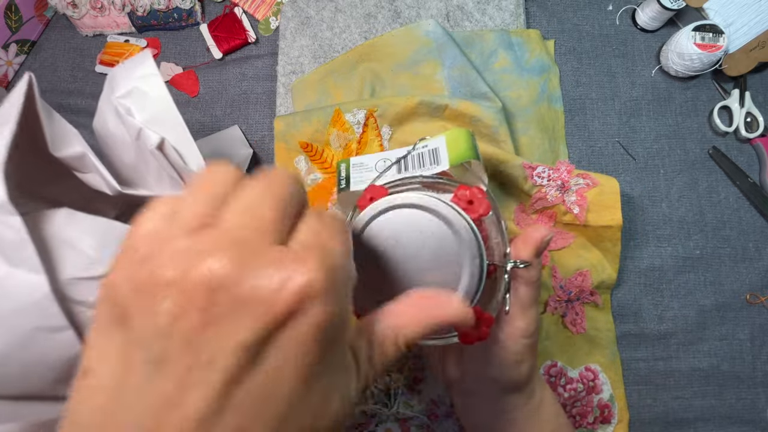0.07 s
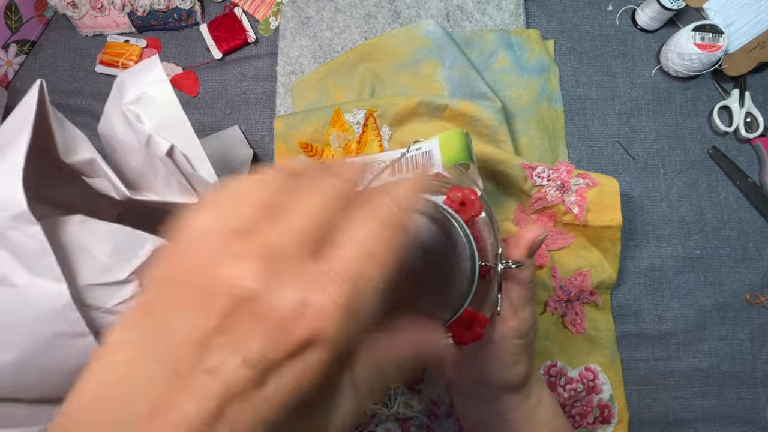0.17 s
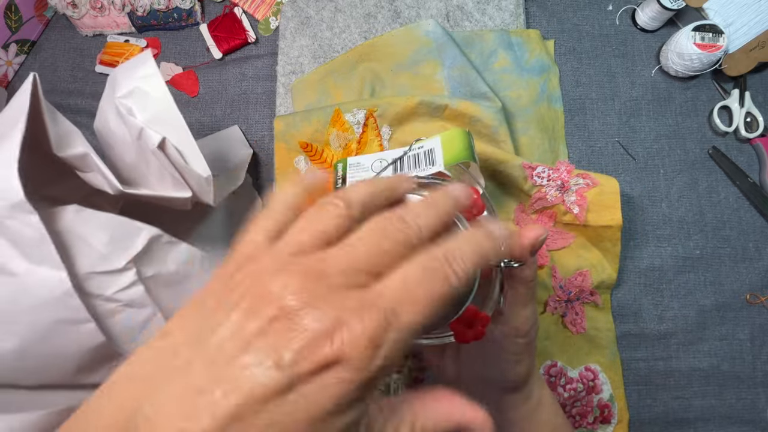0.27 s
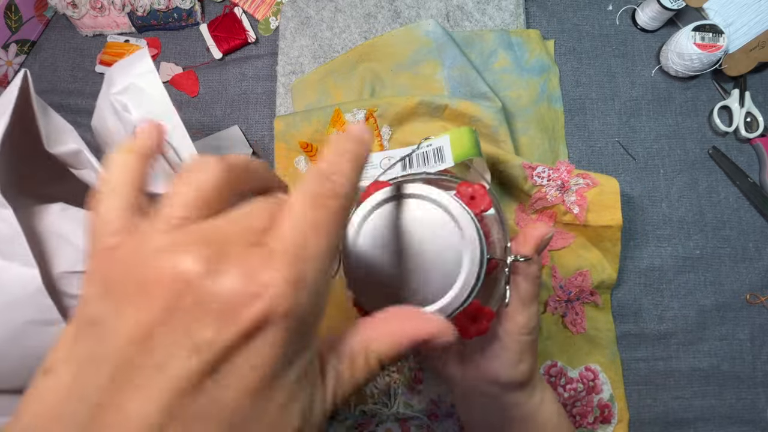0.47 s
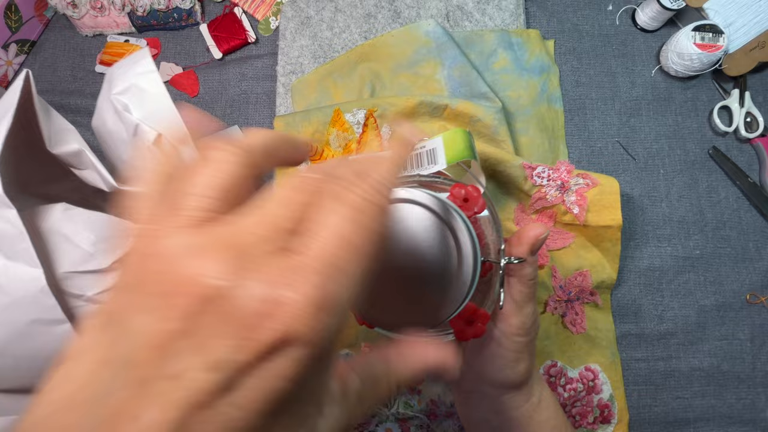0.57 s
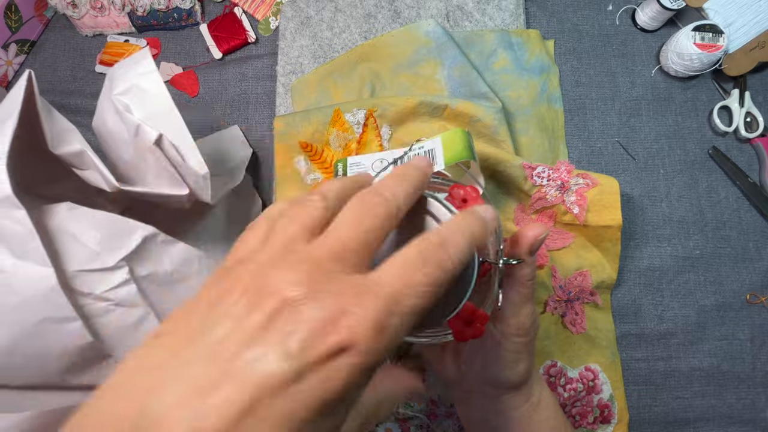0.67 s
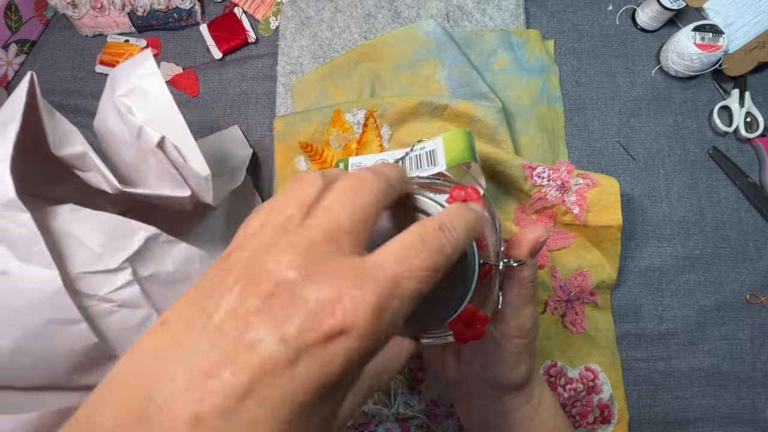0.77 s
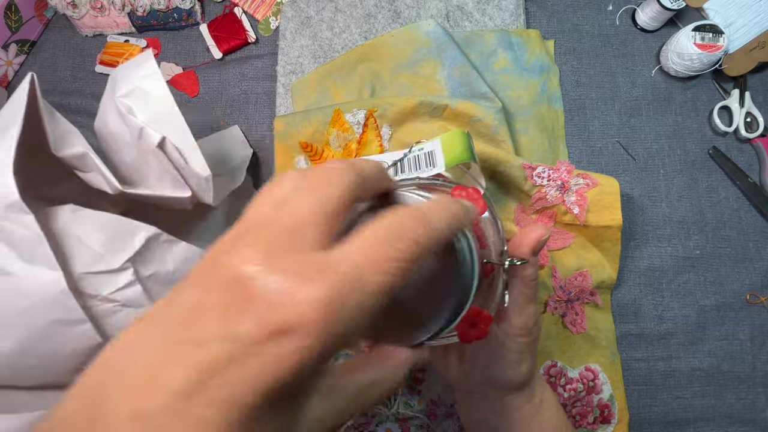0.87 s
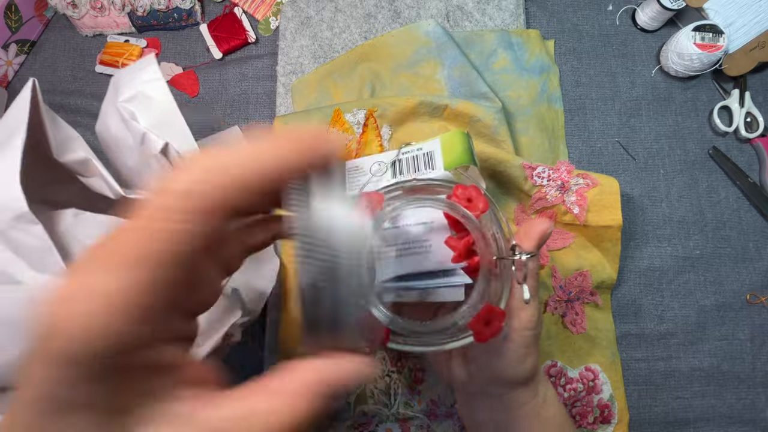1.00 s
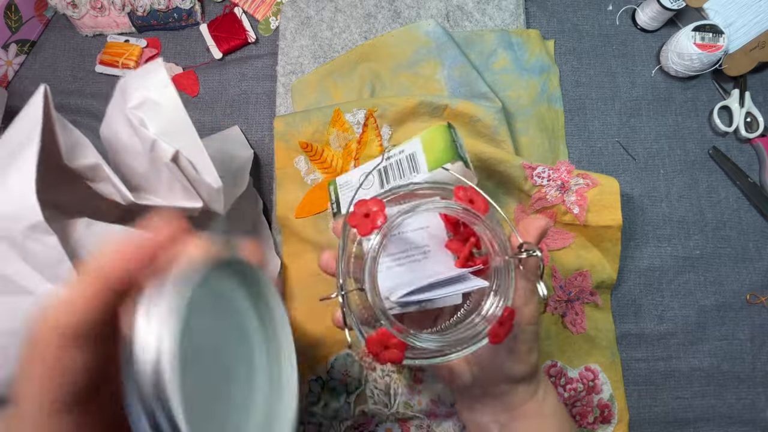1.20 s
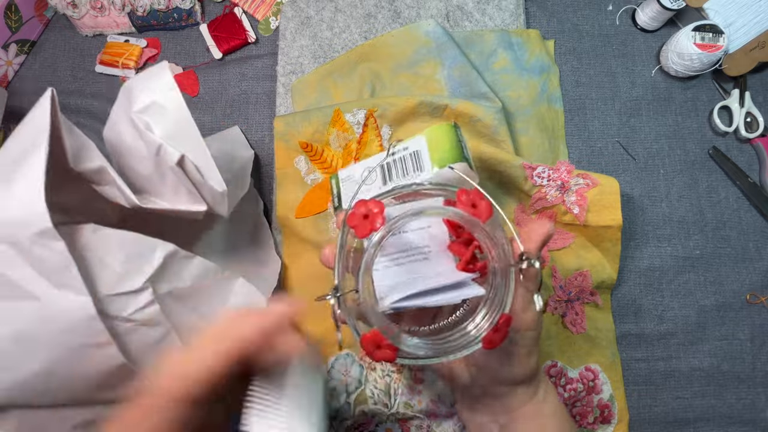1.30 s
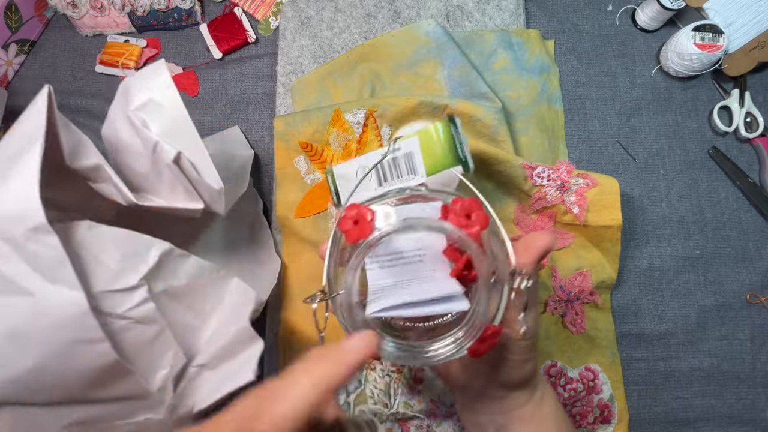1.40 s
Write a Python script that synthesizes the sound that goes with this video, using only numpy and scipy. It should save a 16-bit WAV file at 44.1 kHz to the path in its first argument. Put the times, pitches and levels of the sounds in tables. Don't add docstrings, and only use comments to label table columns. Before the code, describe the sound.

Close scraping and clinking of a tin lid unscrewed from a glass jar, then faint cloth rustle

```python
import sys
import numpy as np
from scipy import signal
from scipy.fft import rfft, irfft, next_fast_len
from scipy.io import wavfile
from scipy.ndimage import uniform_filter1d, map_coordinates

SR = 44100
rng = np.random.default_rng(int(sys.argv[2]) if len(sys.argv) > 2 else 0)


def elevation(decibels):
    levels = np.asarray(decibels, float)
    return 10 ** (levels / 20)


def digitize_waveform(pressure):
    field = np.atleast_2d(pressure).T
    bounded = np.clip(field, -1, 1)
    quanta = np.round(bounded * 32767).astype(np.int16)
    wavfile.write(sys.argv[1], SR, quanta)


N = 63945


def unit(x):
    return x / np.sqrt(np.mean(x ** 2) + 1e-20)


def along(points, hz):
    f, v = np.transpose(points)
    return np.interp(np.log(hz + 1), np.log(f + 1), v)


def curve(rows):
    s, *cols = np.transpose(rows)
    return [np.interp(np.arange(N) / SR, s, c, left=-120) for c in cols]


def wobble(rate):
    return map_coordinates(rng.standard_normal(3000), [np.arange(N) * rate / SR])


def filtered(x, response):
    m = next_fast_len(N + SR // 2)
    return irfft(rfft(x, m) * response(np.fft.rfftfreq(m, 1 / SR)), m)[..., :N]


def resonances(modes, f):
    total = 0
    for k, (hz, width, db) in enumerate(modes):
        total = total + (-1) ** k * elevation(db) * 1j * f * width / (hz * hz - f * f + 1j * f * width)
    return total


def grit(grain_db, slow_db):
    swell = elevation(grain_db * wobble(900) + slow_db * wobble(44.73))
    return unit(swell * rng.standard_normal((2, N)))


def since(s):
    return np.maximum(np.arange(N) / SR - s, 0)


def thud(rows, t60, rise_s):
    total = 0
    for s, db, hz in rows:
        t = since(s)
        total = total + elevation(db - 60 * t / t60) * (1 - np.exp(-t / rise_s)) * np.sin(2 * np.pi * hz * t)
    return total


def patchy(x, depth_db):
    z = signal.stft(x, nperseg=256)[2]
    field = rng.standard_normal(z.shape[1:])
    field = uniform_filter1d(uniform_filter1d(field, size=4, axis=0), size=9, axis=1)
    return signal.istft(z * elevation(depth_db * unit(field)), nperseg=256)[1][:, :N]


def lid():
    # t/s, level/dB, brightness/dB
    twist = [(.226, -62, 2), (.262, -54.5, -12), (.295, -38.5, 10.5), (.33, -40.5, 1.5), (.36, -37.5, -1.5),
             (.375, -34, 5.5), (.425, -30.5, 7.5), (.44, -35, 4), (.47, -35, 1.5), (.50, -38, 4.5),
             (.56, -39, 3.5), (.585, -43, -9), (.64, -48, -6.5), (.70, -60.5, -11), (.76, -55.5, -16.5),
             (.87, -70.5, -8)]
    press_db, bright_db = curve(twist)
    bright_db = np.maximum(bright_db, -20)
    before = elevation(-48.5 - 60 * since(0) / 0.18)
    snags, tilt = catches()
    tinny = tin_lid(press_db, bright_db, before, snags, tilt)
    return tinny + hollow_jar(elevation(press_db) + before, snags.sum(0)) + knocks() + taps_and_pings()


def catches():
    # t/s, peak/dB, length/s, brightness/dB
    catch_rows = [(0.053, -50, 0.0086, 3), (0.13, -54.5, 0.012, -2), (0.392, -36, 0.0034, -3),
                  (.408, -25, 0.0024, -3), (.413, -28, 0.0018, 3), (0.43, -42, 0.0027, 1),
                  (0.471, -27, 0.0036, 0), (0.495, -23, 0.0032, -14), (0.2346, -28.5, 0.0046, 7),
                  (0.2412, -29, 0.0079, -1), (0.269, -39, 0.012, -4), (0.277, -36, 0.022, 2),
                  (0.3026, -27, 0.0041, -7), (0.4437, -21, 0.0079, 13), (0.4511, -19, 0.0055, 19),
                  (0.5984, -15, 0.0065, 8.5), (0.605, -34, 0.015, -18), (.624, -23.5, 0.0059, -2),
                  (0.666, -38, 0.0049, -5), (0.7185, -31, 0.0024, 4), (0.729, -36, 0.0019, -25.5),
                  (0.744, -40, 0.0029, 3), (0.7483, -45.5, 0.0078, -10), (0.7808, -43, 0.0039, -13)]
    rise_s = 0.0012
    bursts = []
    for s, db, hold_s, _ in catch_rows:
        t = since(s)
        bursts.append(elevation(db - 7.5) * (1 - np.exp(-t / rise_s)) * np.exp(-(t / hold_s) ** 2))
    return np.array(bursts), elevation(np.array(catch_rows)[:, 3] / 2)


def tin_lid(press_db, bright_db, before, snags, tilt):
    # f/Hz, width/Hz, level/dB
    lid_modes = [(1909, 30, 19), (2585, 40, -1), (3420, 70, 4), (4080, 110, 2), (4670, 55, 7),
                 (6300, 80, 0), (4910, 60, 2), (9200, 200, 3), (10340, 230, -3), (11100, 150, -8)]
    dull = elevation(press_db - bright_db / 2) + before
    sharp = elevation(press_db + bright_db / 2) + 0.26 * before
    grains = unit(patchy(grit(grain_db=1.5, slow_db=1.7), depth_db=2.5))
    scrape = tin(dull, sharp, 3200, grains)
    catch = tin((1 / tilt) @ snags, tilt @ snags, 7000, grit(grain_db=2.0, slow_db=-1.1))

    low_scrape = elevation(press_db - 0.79 * bright_db / 2) * grit(grain_db=2.5, slow_db=-1.0)
    ring = filtered(low_scrape + 0.5 * catch, lambda f: resonances(lid_modes[:1], f))
    for mode in lid_modes[1:]:
        wander = elevation(1.5 * wobble(20.5))
        ring = ring + filtered(scrape * wander + 0.92 * catch, lambda f: resonances([mode], f))
    return 0.91 * (1.006 * (scrape + catch) + ring)


def tin(dull, sharp, split_hz, grains):
    # f/Hz, level/dB
    tin_colour = [(300, -6), (800, 10), (2000, 4), (5000, 4.5), (8000, -0.5), (12000, 5.5), (14500, -4.5),
                  (16000, -13)]
    colour = lambda f: elevation(along(tin_colour, f))
    high = lambda f: 1 / (1 + (split_hz / (f + 1)) ** 4)
    low_part = filtered(dull * grains, lambda f: colour(f) * (1 - high(f)))
    return low_part + filtered(sharp * grains, lambda f: colour(f) * high(f))


def hollow_jar(pressure, snag):
    # f/Hz,
    # width/Hz, level/dB
    jar_modes = [(129.6, 10.5, -10), (211.2, 18, -4), (334, 40.6, -3.5), (408, 33, -3.5), (498.3, 21, 3),
                 (672.4, 33.7, -0.5)]
    follows = 0.62
    shake = elevation(-36.5) * ((pressure + 3.7 * snag) / elevation(-33)) ** follows
    shake = shake * (pressure > elevation(-78))
    return 6.16 * filtered(shake * grit(grain_db=5.0, slow_db=1.5), lambda f: resonances(jar_modes, f))


def knocks():
    # t/s, peak/dB, f/Hz
    knock_rows = [(0.002, -46, 582), (0.024, -43.5, 392), (0.059, -37, 353), (0.134, -39.5, 340),
                  (0.229, -37, 490), (0.242, -24.5, 370), (0.265, -32.5, 435), (0.282, -23.5, 370),
                  (0.297, -19.5, 480), (0.319, -24, 334), (0.358, -30, 365), (0.388, -21.5, 354),
                  (0.404, -46, 405), (0.45, -22.5, 414), (0.468, -25, 360), (0.552, -26.5, 460),
                  (0.587, -29, 477), (0.598, -21.5, 391), (0.624, -25.5, 495), (0.661, -41, 392),
                  (0.667, -29.5, 405), (0.721, -25.5, 387), (0.782, -39, 496)]
    # t/s, peak/dB, f/Hz
    rim_rows = [(.058, -50, 560), (.246, -44, 504), (.31, -32, 520), (.345, -24.5, 492), (.362, -34.5, 500),
                (.395, -32, 490), (.425, -45, 510), (.535, -36, 507), (.612, -42, 490), (.75, -39, 503),
                (.328, -34.5, 536), (.407, -51, 700), (.45, -27, 688), (.468, -26.5, 640),
                (.49, -28.5, 706), (.51, -32, 687), (.527, -30, 636), (.564, -29, 690), (.601, -23.5, 660)]
    rise_s = 0.0037
    return elevation(2.5) * thud(knock_rows, 0.038, rise_s) + thud(rim_rows, 0.043, rise_s)


def taps_and_pings():
    # t/s, peak/dB, f/Hz, t60/s
    ping_rows = [(.012, -52.5, 1753, 0.15), (0.235, -40, 1913, 0.12), (.236, -51, 3510, 0.046),
                 (.267, -44, 3470, .06), (0.279, -37.5, 1917, 0.079), (.2823, -40.5, 3520, .04),
                 (.297, -29, 1902, 0.12), (.302, -37.5, 3344, 0.15), (0.31, -40.5, 1576, 0.16),
                 (.342, -36.5, 1920, 0.056), (.375, -39.5, 1892, .12), (0.399, -38, 4000, .06),
                 (.403, -36.5, 1930, 0.13), (0.4559, -40, 1887, 0.18), (.518, -36.5, 4680, 0.2),
                 (.5246, -36.5, 1905, 0.087), (.549, -40, 4730, 0.17), (.555, -38, 1885, 0.054),
                 (0.5986, -29.5, 4620, 0.058), (.5996, -30.5, 9250, 0.029), (0.602, -30.5, 2574, 0.045),
                 (.6255, -32, 4840, 0.068), (.6255, -34, 10400, 0.02), (.668, -50, 9500, .02),
                 (0.7198, -35.5, 4250, 0.015), (0.7204, -38, 5540, 0.013), (.7193, -42.5, 10700, 0.025),
                 (0.7311, -38, 4820, .015), (.746, -46, 11070, 0.034), (.752, -43.5, 4680, 0.033),
                 (.754, -43.5, 1924, 0.04), (.781, -43, 3300, 0.021), (.782, -43, 4960, 0.018)]
    # t/s, peak/dB, f/Hz, t60/s
    tap_rows = [(0.549, -50, 61, 0.35), (0.55, -54, 130, 0.62), (1.3, -59.5, 157, 0.12),
                (1.402, -47.5, 213, 0.098), (1.4, -60.5, 118, .2), (0.0027, -54, 133, 0.13),
                (1.6, -64, 160, 0.027)]
    return sum(thud([row[:3]], row[3], 0.27 / row[2] + 0.001) for row in tap_rows + ping_rows)


def sleeve():
    # t/s, level/dB
    movement = [(.8, -80), (.87, -68), (.95, -60), (1.03, -58), (1.14, -61.5), (1.27, -56.5),
                (1.385, -59.5), (1.415, -92), (1.45, -95)]
    # t/s, peak/dB, f/Hz, t60/s
    crackles = [(0.987, -44.5, 1790, 0.059), (.997, -44.5, 546, 0.092), (1.166, -53, 1670, 0.046),
                (1.176, -60, 473, 0.033), (1.258, -50, 3500, 0.027), (1.281, -56, 2100, 0.033),
                (1.304, -48, 2200, 0.054), (1.329, -35, 2330, 0.034), (1.334, -34.5, 1165, 0.038),
                (1.352, -39, 1020, 0.042), (1.362, -51.5, 4600, 0.014), (1.366, -32.5, 850, 0.018),
                (1.369, -32.5, 490, 0.021), (1.384, -42.5, 935, 0.043), (1.4, -38, 600, 0.024)]
    # f/Hz, level/dB
    cloth_colour = [(100, -4), (500, -0.5), (1500, 2), (5000, 1.5), (8000, -1.5), (12500, 5.5),
                    (14500, -3.5), (16000, -7)]
    snaps, tones = 0, 0
    for s, db, hz, t60 in crackles:
        t = since(s)
        snaps = snaps + elevation(db - 6.0 - 60 * t / t60) * (1 - np.exp(-t / 0.0016))
        tones = tones + thud([(s, db, hz)], 0.6 * t60, 0.0015)
    hiss = unit(filtered(grit(grain_db=-0.5, slow_db=1.73), lambda f: elevation(along(cloth_colour, f))))
    return (2.2 * elevation(curve(movement)[0]) + snaps) * hiss + elevation(-2.0) * tones + open_jar()


def open_jar():
    # f/Hz, width/Hz, start/s, end/s, level/dB
    lifted = (520, 20, 1.04, 1.16, -62)
    hz, width, start, end, db = lifted
    hum = unit(filtered(grit(grain_db=0, slow_db=1), lambda f: resonances([(hz, width, 0)], f)))
    gate = np.clip(since(start) / 0.09, 0, 1) * np.clip(1 - since(end) / 0.04, 0, 1)
    return elevation(db) * gate * hum


def air():
    # f/Hz, level/dB
    air_colour = [(30, -48), (44, -11), (57, 3), (70, -13.5), (300, -21.5), (1000, -25.5), (3000, -27),
                  (10000, -30), (16000, -32)]
    noise = grit(grain_db=1.5, slow_db=-1.7)
    return elevation(-64) * unit(filtered(noise, lambda f: elevation(along(air_colour, f))))


def room(x):
    t = np.arange(SR // 3) / SR
    t60 = 0.045
    tail = rng.standard_normal((2, len(t))) * elevation(-60 * t / t60) * (t > 0.004)
    return signal.fftconvolve(x, tail / np.linalg.norm(tail[0]), axes=1)[:, :N]


def ports(x, side, low_turn):
    # f/Hz, likeness [0..1]
    likeness = [(50, 0.86), (400, 1), (800, 0.49), (2500, 0.44), (6000, 0.18), (8800, 0.16), (10200, 0.49)]
    # f/Hz, likeness [0..1]
    likeness_top = [(11300, .98), (11750, 1), (12700, 1), (13800, .75), (14700, 1)]
    # f/Hz, right leads/rad
    top_turn = [(9000, .5), (10200, 1.05), (11950, np.pi), (12400, np.pi), (14800, 2 * np.pi)]
    alike = lambda f: np.clip(along(likeness + likeness_top, f), 0, 1)

    def turn(f):
        top = np.interp(f, *np.transpose(top_turn))
        return np.exp(1j * np.where(f < top_turn[0][0], low_turn(f), top))

    def balance(f):
        return elevation(along(side, f) * (f < likeness_top[0][0]) * np.array([[0.5], [-0.5]]))

    shared = filtered(x[0], lambda f: alike(f) * turn(f))
    right = shared + filtered(x[1], lambda f: np.sqrt(1 - alike(f) ** 2))
    return filtered(np.array([x[0], right]), balance)


def scene():
    # f/Hz, left over right/dB
    lid_side = [(100, 2.5), (600, 5.5), (1300, 1), (2400, -5), (4400, 1.5), (9000, -3.5), (11000, -3.5)]
    # f/Hz, right leads/rad
    lid_turn = [(300, -.3), (680, -2.1), (1900, -1.8), (2600, -3.2), (3700, -6.2), (4900, -3.6),
                (9000, -5.5)]
    # f/Hz, left over right/dB
    cloth_side = [(100, -7.5), (1000, 8), (5000, 8.5), (7500, -0.5), (9500, -2), (11000, -5)]
    # f/Hz, left over right/dB
    air_side = [(100, 4), (2000, 9.5), (9000, 0.5), (11000, 0)]
    cloth_lag_s, air_lag_s = 0.000439, 0.00049
    jar, cloth = lid(), sleeve()
    jar = jar + elevation(-10) * room(jar)
    return (ports(jar, lid_side, lambda f: along([(0.0039, 0.011)] + lid_turn, f))
            + ports(cloth, cloth_side, lambda f: -2 * np.pi * f * cloth_lag_s)
            + ports(air(), air_side, lambda f: -2 * np.pi * f * air_lag_s))


def top_cut(x):
    return signal.sosfilt(signal.butter(12, 15920, fs=SR, output="sos"), x)


def record(dry):
    mix = filtered(dry, lambda f: (f < 15900) / (1 + (42 / (f + 1)) ** 6))
    return top_cut(mix)


dry = scene()
out = record(dry)
digitize_waveform(out)
```